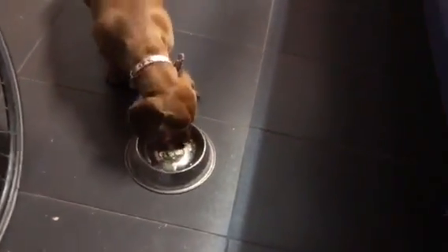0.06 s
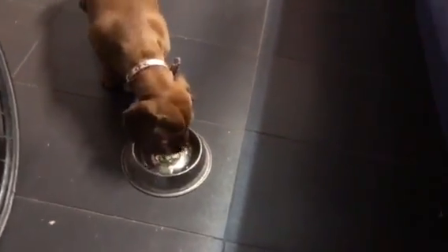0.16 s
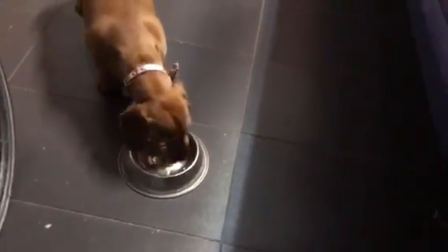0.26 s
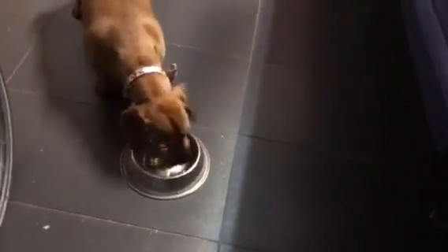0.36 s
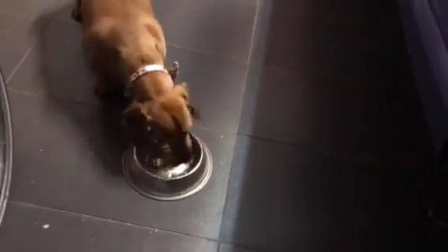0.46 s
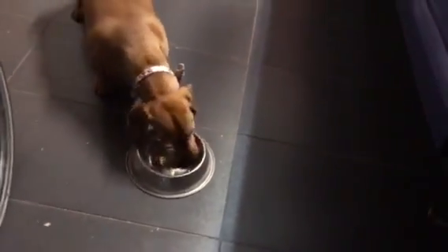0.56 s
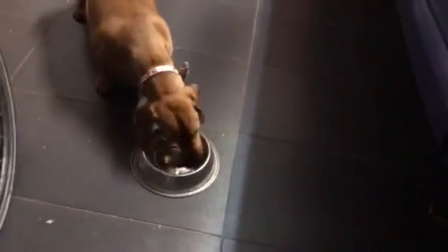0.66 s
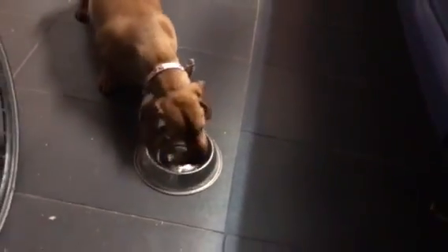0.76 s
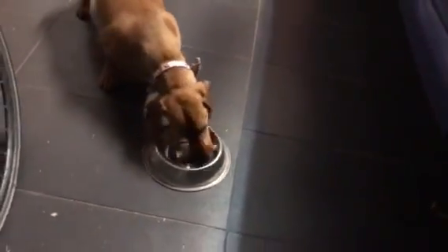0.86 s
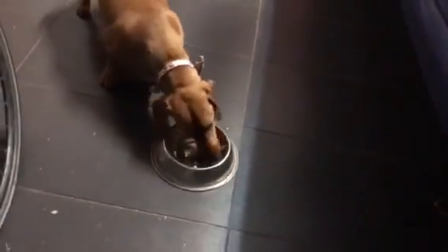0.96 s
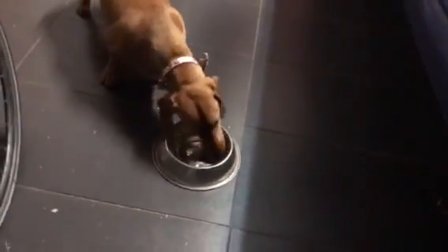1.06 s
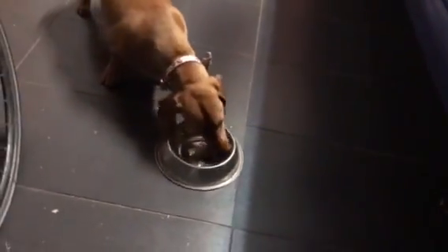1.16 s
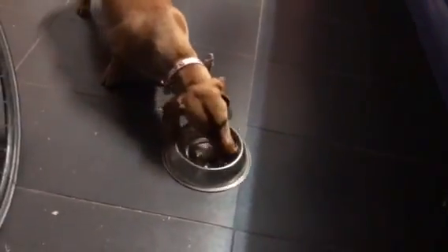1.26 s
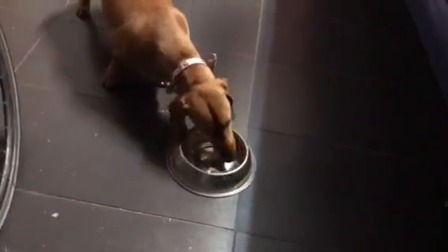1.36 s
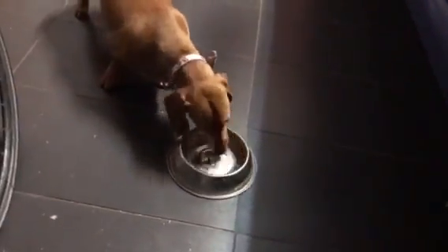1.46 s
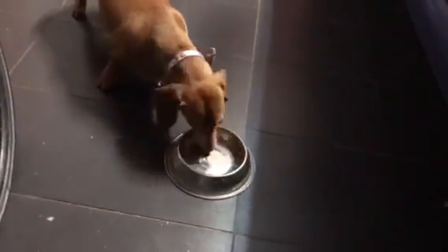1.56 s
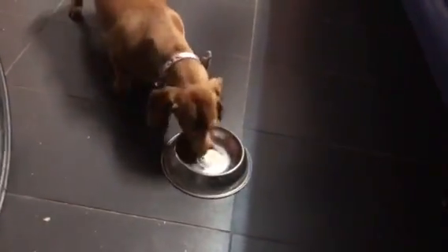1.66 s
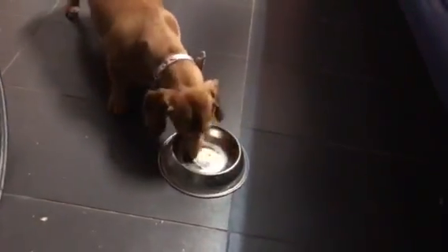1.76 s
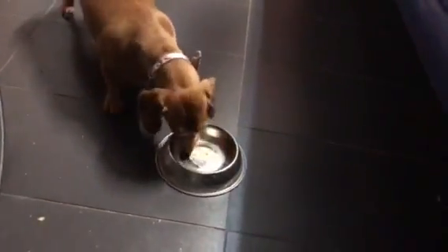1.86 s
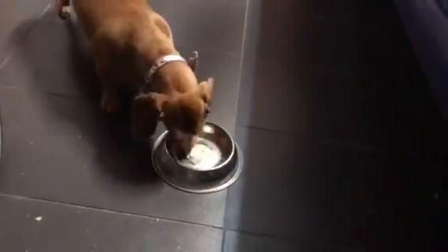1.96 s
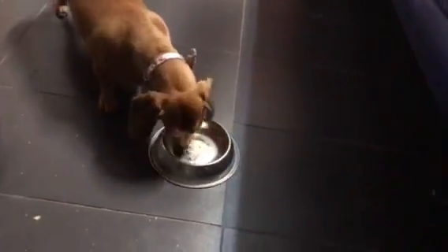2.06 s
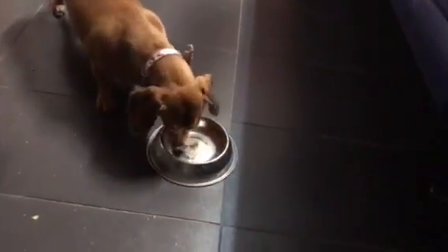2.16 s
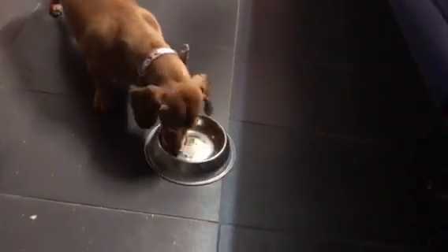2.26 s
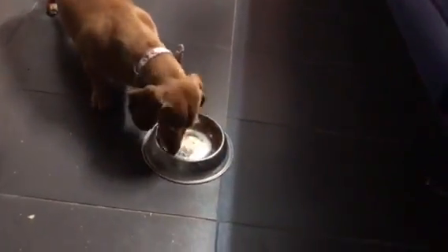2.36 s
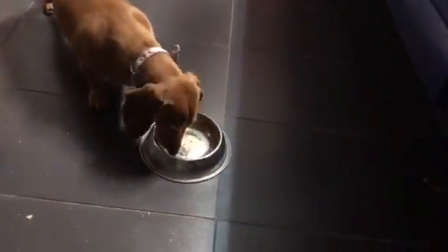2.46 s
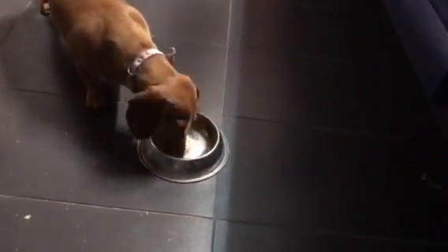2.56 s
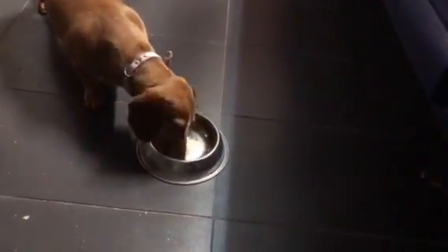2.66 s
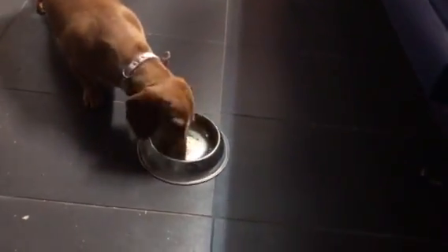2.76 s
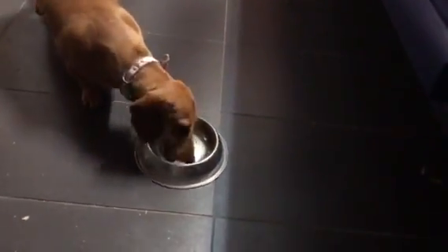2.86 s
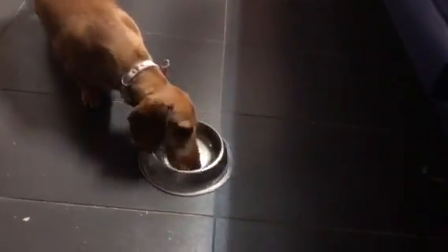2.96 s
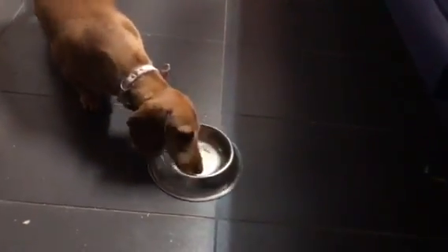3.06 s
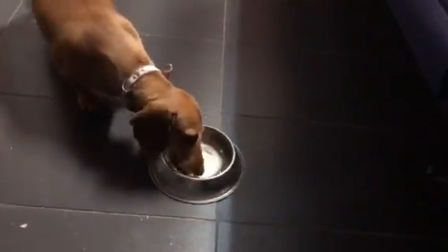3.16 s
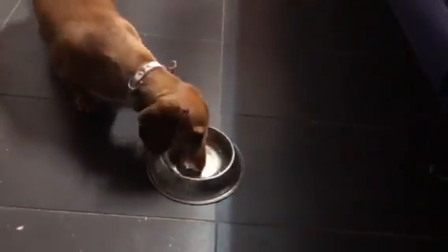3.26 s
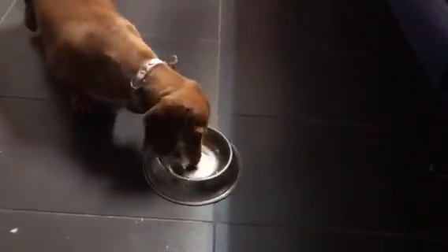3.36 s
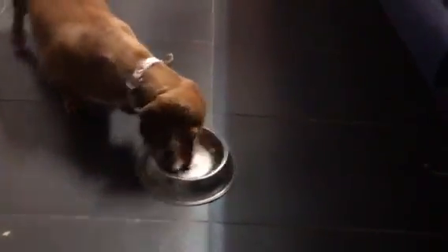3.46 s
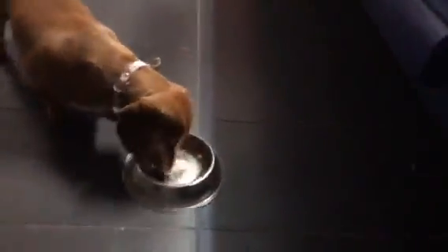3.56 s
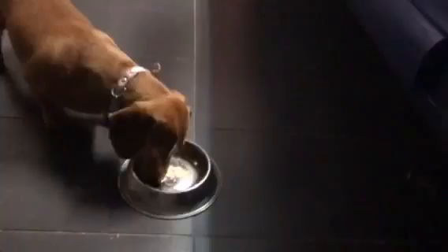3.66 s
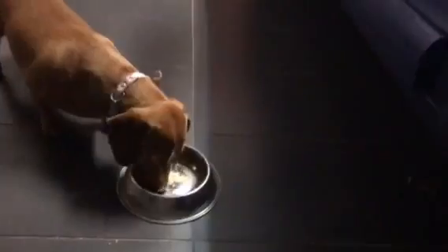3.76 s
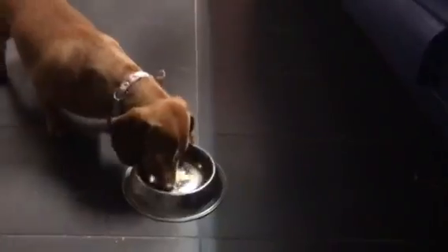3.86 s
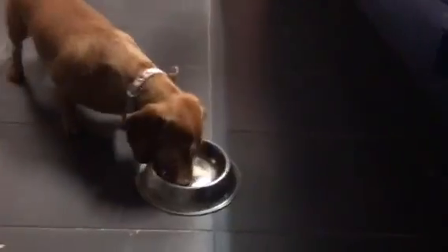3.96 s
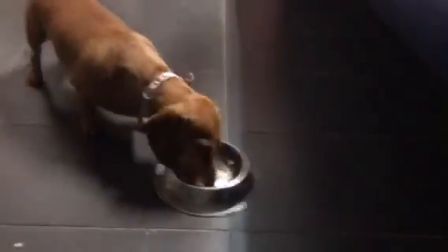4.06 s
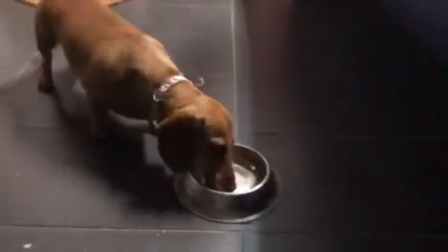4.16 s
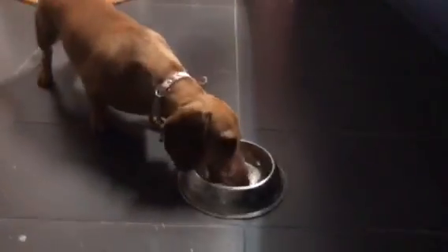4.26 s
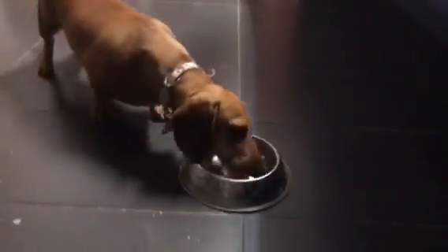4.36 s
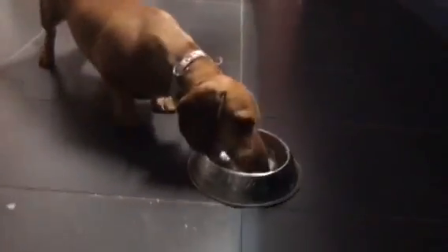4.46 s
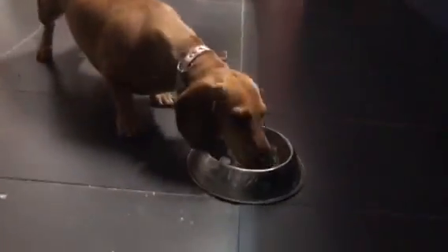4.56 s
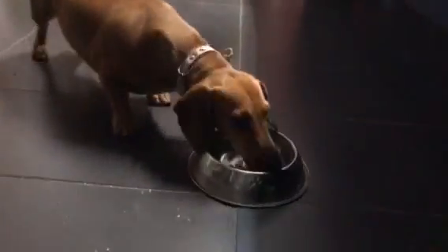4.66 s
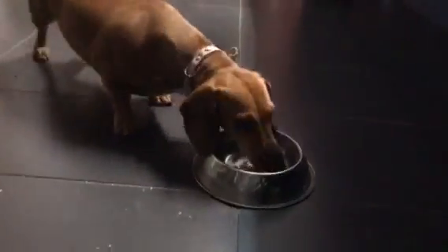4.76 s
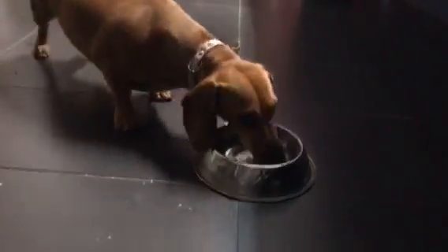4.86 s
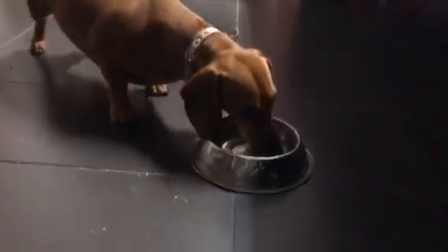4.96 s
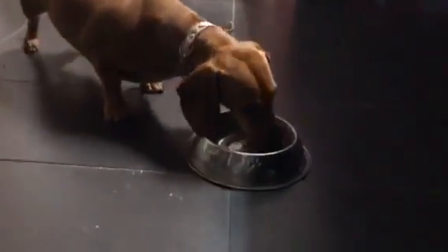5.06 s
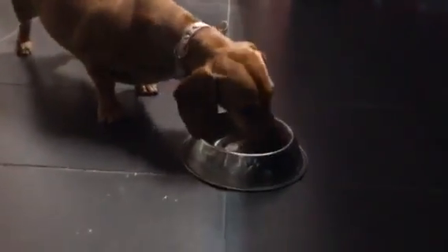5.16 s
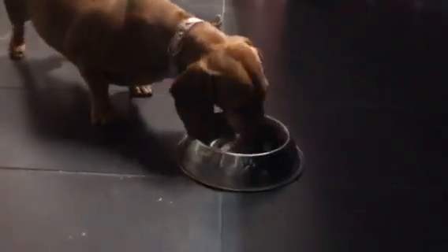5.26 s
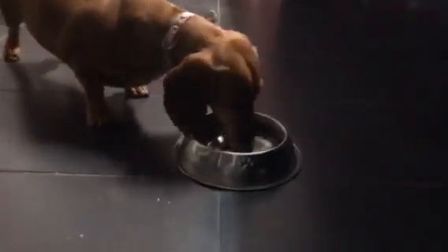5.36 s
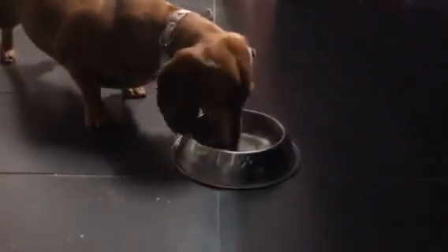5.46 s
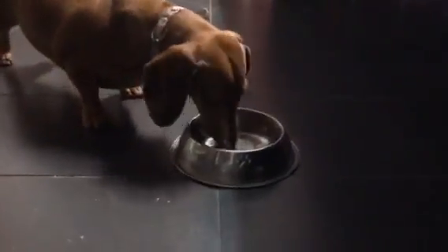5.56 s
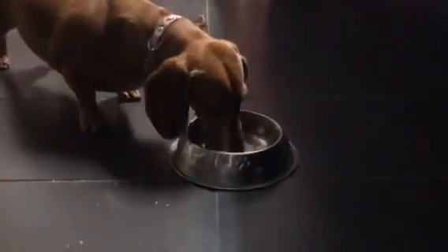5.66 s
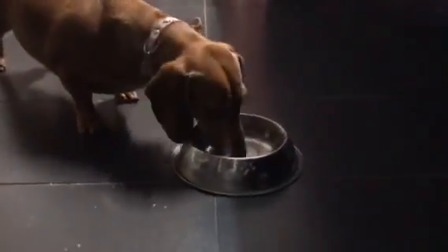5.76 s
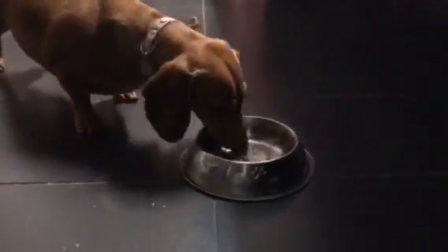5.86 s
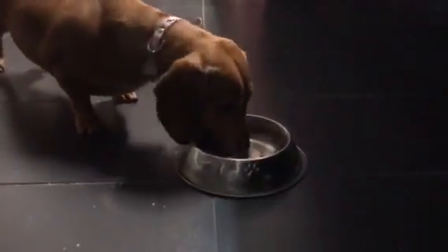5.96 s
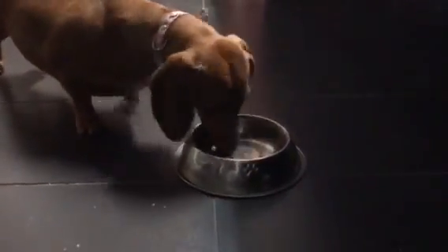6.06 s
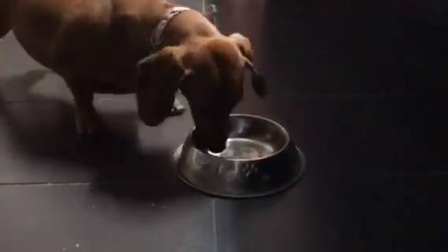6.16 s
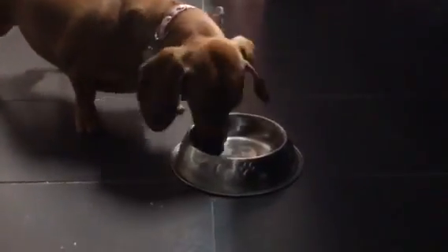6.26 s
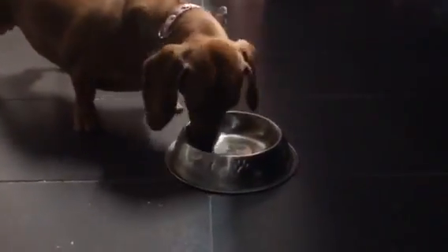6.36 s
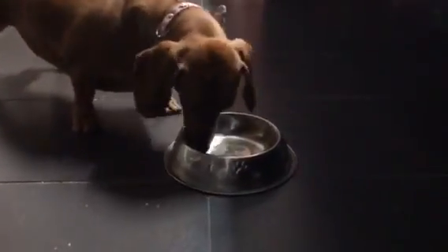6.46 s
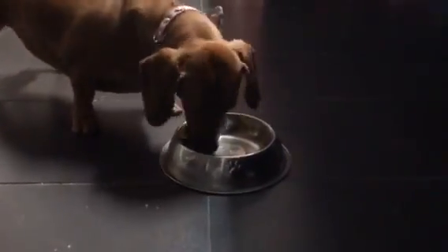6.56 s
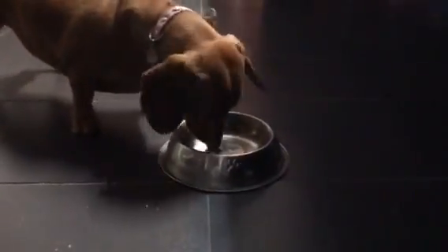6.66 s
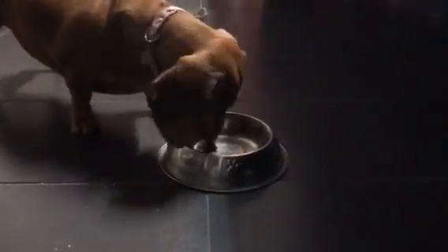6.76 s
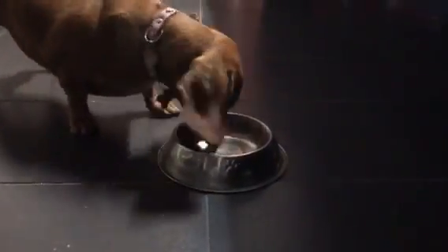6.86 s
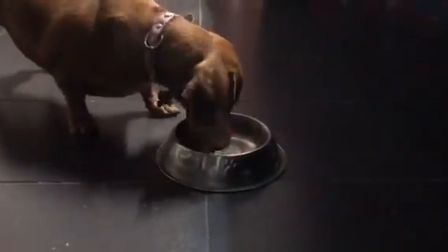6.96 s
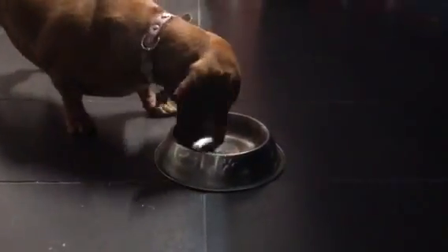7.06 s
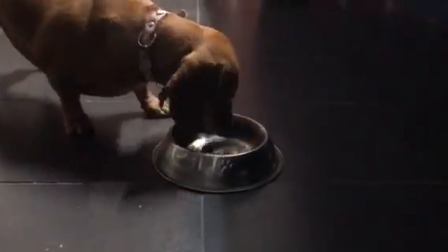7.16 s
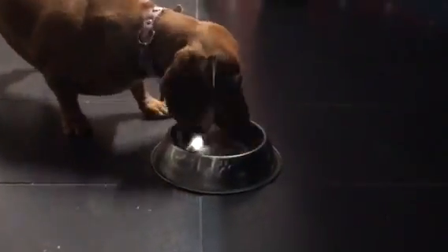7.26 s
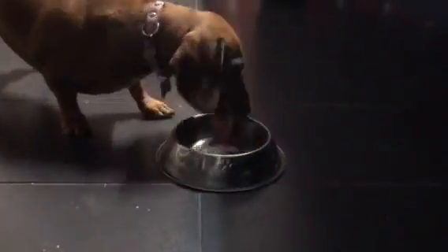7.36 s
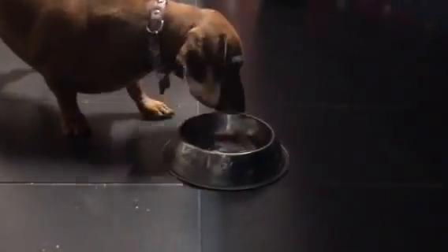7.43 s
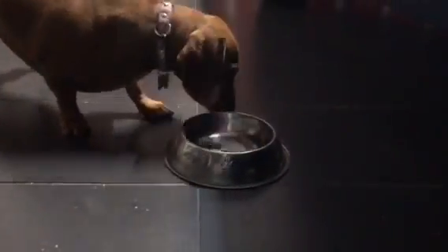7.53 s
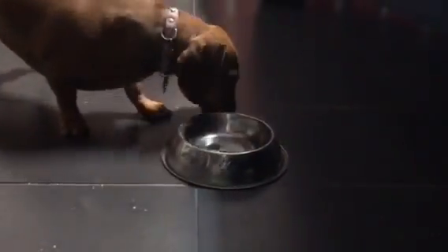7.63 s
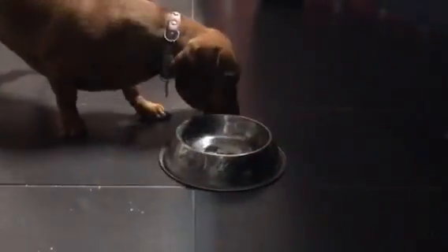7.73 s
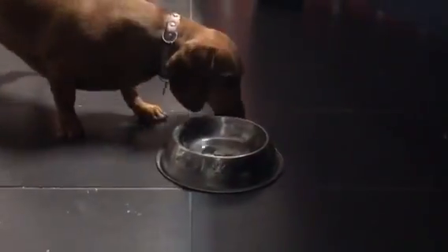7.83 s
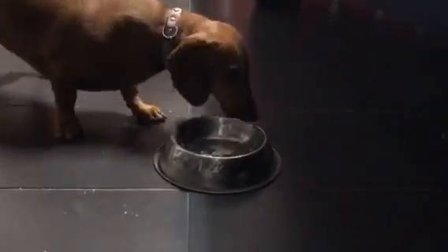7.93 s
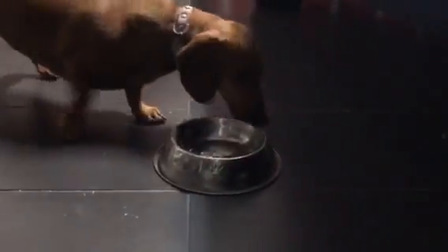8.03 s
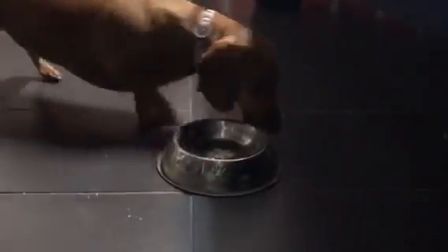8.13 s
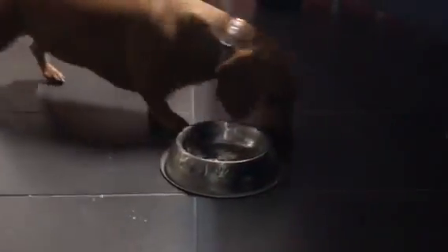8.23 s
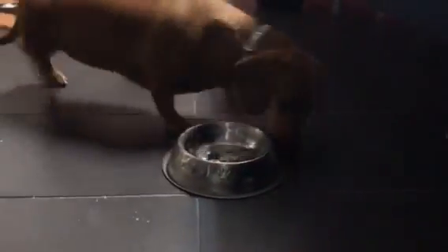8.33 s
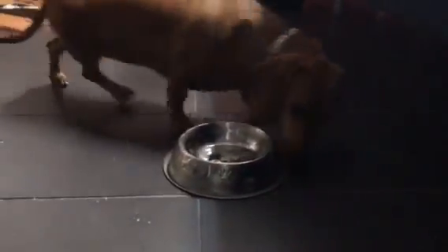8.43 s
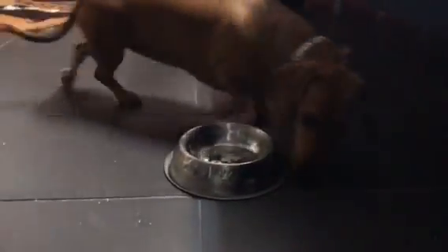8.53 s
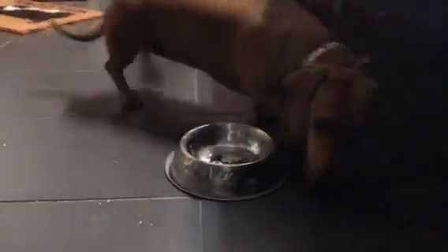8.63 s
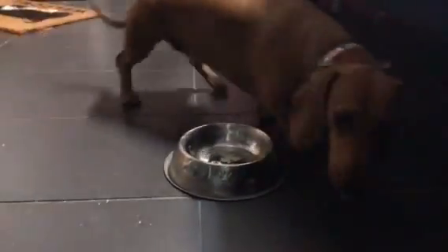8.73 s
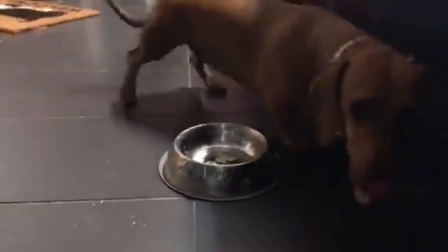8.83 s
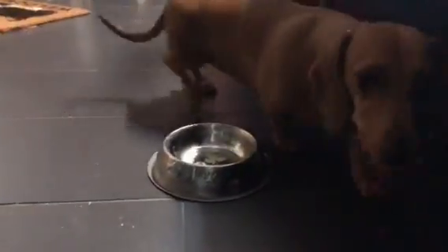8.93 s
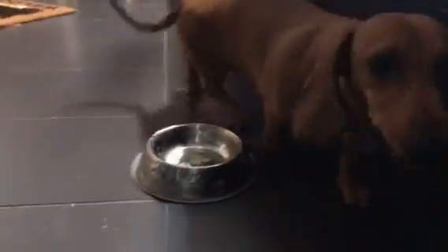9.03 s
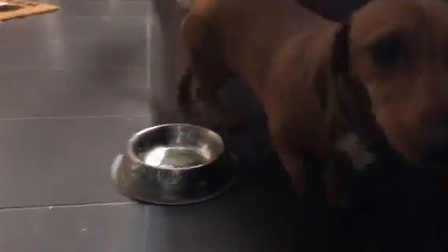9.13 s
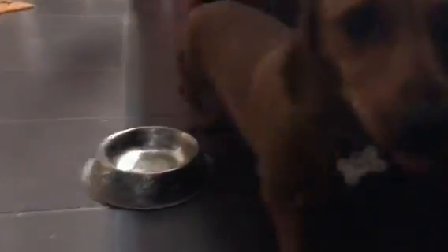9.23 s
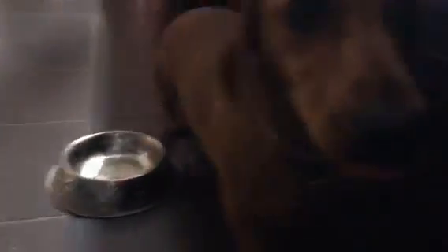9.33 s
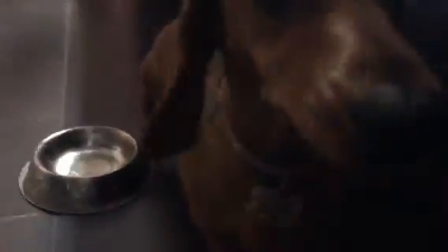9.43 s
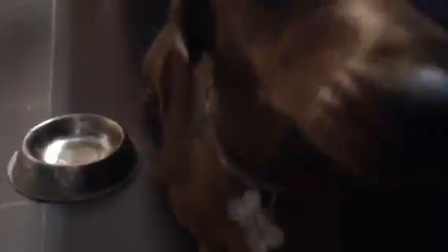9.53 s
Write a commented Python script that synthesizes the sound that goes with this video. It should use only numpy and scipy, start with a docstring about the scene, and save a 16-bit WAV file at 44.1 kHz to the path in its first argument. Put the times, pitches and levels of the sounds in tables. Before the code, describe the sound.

A dog licks a steel bowl that scrapes and rings on tiles in irregular bursts, then walks off with clicking claws.

```python
"""A small dog licks out a steel bowl in a tiled room; an appliance hums throughout.
For 8 s, pushes of the tongue drag the rim over the tiles: it judders, rings the bowl and slips free
with bright spits. Knocks, wet ticks and sniffs fall among the pushes.
After a last faint scrape at 8.4 s the dog walks off, claws clicking, pads brushing the tiles."""
import sys
import numpy as np
from scipy import signal
from scipy.fft import rfft, irfft, next_fast_len
from scipy.io import wavfile

SR = 44100
rng = np.random.default_rng(int(sys.argv[2]) if len(sys.argv) > 2 else 0)


def unload_audio(sound):
    """Save the sound as a 16-bit wav file, at the path given as the first command line argument."""
    columns = np.transpose(np.atleast_2d(sound))
    # keep every value between -1 and 1, then stretch to whole-number steps
    steps = np.round(np.clip(columns, -1, 1) * 32767)
    wavfile.write(sys.argv[1], SR, steps.astype(np.int16))


N = 422919

# room tone spectrum: (frequency [Hz], relative density [dB])
AIR_SPECTRUM = [(53, -11), (90, 3), (184, 2), (488, -5.5), (896, -5.5), (2830, -12), (4750, -13),
                (8910, -20), (15000, -23), (16000, -22)]
# motor drone bands: (centre [Hz], width [Hz], level before swell [dB])
DRONE_BANDS = [(61, 9.1, -62), (136.5, 9.3, -71), (2400, 28, -79.5), (2400, 8.7, -90)]
# drone grows as the microphone sinks: (time [s], gain [dB])
DRONE_SWELL = [(0, -6), (2, -3), (4, -4), (6, 4), (7.3, 4), (8.3, 0.5), (9.59, 5)]
# sniffs, brushing pads: (time [s], nominal length [s], level [dB], centre [Hz], body re hiss [dB])
PUFFS = [(3.394, 0.18, -62.5, 5000, 3), (3.70, 0.073, -61, 4470, 1), (3.772, 0.27, -49.5, 5560, -29),
         (4.967, .05, -61, 4000, -8), (7.249, 0.45, -63, 5060, 6), (8.097, 0.16, -61.5, 4500, 5),
         (8.24, 0.032, -66, 3960, -1), (8.35, .04, -60, 9000, -16), (8.397, 0.036, -61.5, 11000, -10),
         (8.454, 0.07, -66.5, 5000, -1), (8.523, 0.15, -74, 6040, 5), (8.66, 0.09, -73.5, 5000, 9),
         (8.845, 0.17, -55, 4500, -3), (9.028, 0.03, -54.5, 4960, -12), (9.07, 0.061, -63.5, 11000, -10),
         (9.169, 0.03, -67, 6000, -3), (9.323, .05, -100.5, 5000, -19), (9.429, 0.1, -59, 8000, -1)]
# claws, wet tongue ticks: (time [s], relative peak [dB], centre [Hz], body gain [dB])
TICKS = [(0.1344, -46, 2790, 7), (0.1695, -35, 2790, -12), (2.4193, -39, 9750, -2),
         (3.7713, -33.5, 4840, -25), (4.986, -39, 5060, 5), (5.5734, -44, 2530, 15),
         (5.6465, -37, 11800, -22), (5.7234, -54.5, 2610, 11.5), (5.7747, -37, 6240, -20),
         (6.263, -32, 6400, -16), (6.578, -39.5, 7050, -7), (6.977, -30.5, 6100, -26),
         (7.005, -38, 10100, -14), (8.097, -40, 6500, -15), (8.459, -41.5, 3250, -18),
         (8.567, -51.5, 2780, 7), (8.628, -40, 6790, -12), (8.6392, -25, 5600, -30),
         (8.6499, -29, 4270, -10), (9.0259, -30.5, 3370, -29), (9.0838, -50, 3320, -18),
         (9.1553, -31, 7900, -43), (9.1603, -37, 8560, -23), (9.2705, -31, 12100, -38),
         (9.3194, -21.5, 4750, -48), (9.3915, -32.5, 6050, -23), (9.4223, -41, 5150, -5),
         (9.4357, -34, 8290, -22), (9.4555, -34, 6290, -10), (9.4653, -27.5, 7100, -30),
         (9.483, -38, 3030, 3.5)]
# bowl knocks, tongue pops: (time [s], peak [dB], centre [Hz], decay [cycles], wall clank gain [dB])
KNOCKS = [(0.385, -32.5, 789, 3.5, 12), (0.762, -30, 290, 6.5, -3), (1.285, -31, 880, 4.0, 1),
          (1.387, -18.5, 930, 4.8, 8), (1.823, -39, 1190, 4.0, -10), (2.036, -40, 996, 4.0, -11),
          (2.547, -49, 150, 3.6, -7), (3.397, -40.5, 410, 6, -8), (3.674, -46.5, 899, 5.4, -15),
          (3.812, -40.5, 317, 4.4, 7), (3.952, -40, 331, 5.2, -9), (4.161, -30, 1080, 4.7, -11),
          (4.425, -28, 576, 4.7, 12), (5.201, -38.5, 710, 4.0, -11), (5.573, -30.5, 400, 5.9, -15),
          (7.774, -39.5, 507, 5.7, -2)]
# rim slipping free: (time [s], relative peak [dB])
SLIPS = [(0.3896, -21), (0.7628, -20), (1.3215, -23), (1.8423, -31), (2.0254, -33), (2.1222, -20),
         (2.9892, -20), (3.0536, -22), (3.1319, -18), (4.177, -21), (4.4225, -19.5), (4.5616, -20),
         (5.6462, -48), (5.7744, -44.5), (5.8417, -26.5), (6.2623, -47), (6.3611, -35), (6.9762, -47),
         (7.4127, -24), (7.4995, -17)]
# bowl modes: (frequency [Hz])
MODE_HZ = [376, 451, 538, 610, 708, 903, 1040, 1120, 1177, 1323, 1604, 1750, 1912, 2035, 2064, 2190, 2530,
           2794, 3393, 3863, 4130, 4352, 4527, 4984, 5390, 5785, 6100, 6310, 6660, 8060]
# same modes: (pressed width [Hz], gain [dB], free T60 [s])
MODE_RESPONSE = [(33.6, -4, 0.17), (30, -10.5, .4), (25, -12, 0.23), (25.2, -9.5, 0.3), (32.4, -9, 0.47),
                 (20.4, -2.5, 0.22), (22, -12.5, .4), (34, -11, 0.36), (19.8, 0, 0.6), (8.5, -12, 0.57),
                 (32.4, -6.5, 0.47), (43.2, -4, 0.55), (14, -4.5, 0.92), (15, -8.5, 0.98), (20, -5, 0.62),
                 (39, -20, .4), (35, -18.5, 0.2), (33.8, -6, 0.49), (25, -7, 0.29), (20, -13, 1),
                 (11, -17.5, 0.94), (14, -15, 1), (12, -16, 0.51), (17, -19.5, 1), (16, -19, 0.76),
                 (45, -14.5, .5), (19, -17, 0.54), (8.5, -16, .5), (22, -17.5, 0.36), (11, -20.5, .4)]
# where the tongue presses selects the low modes: (time [s], favoured pitch [Hz], floor boom gain [dB])
TONGUE_PRESS = [(0.0, 636, 5), (0.58, 845, 3.5), (0.71, 590, 4.5), (0.93, 800, 5), (1.29, 660, 1),
                (1.8, 972, 6.5), (2.18, 626, 4), (2.47, 813, -4), (3.25, 910, 1), (3.5, 454, 4),
                (3.63, 671, 0), (3.92, 492, 11), (4.08, 803, 9), (4.28, 940, -5.5), (4.61, 556, 3),
                (4.81, 653, 7), (5.06, 454, -2), (5.15, 834, -10), (5.3, 910, -4), (5.55, 542, 11),
                (5.7, 998, -1), (6.15, 902, 0), (6.37, 604, 0), (6.64, 850, 2.5), (6.86, 830, -5),
                (7.24, 479, 0), (7.57, 454, -1), (8.0, 720, 2)]
# rim-on-tile rumble spectrum: (frequency [Hz], relative density [dB])
RUMBLE_SPECTRUM = [(120, -57), (250, -14), (400, -19.5), (1000, -11), (1900, -18.5), (2500, -21.5),
                   (4500, -42), (7000, -37), (9000, -36)]
# tile thrum under the bowl: (frequency [Hz], relative density [dB])
BOOM_SPECTRUM = [(60, -45), (130, -1), (220, -1.5), (400, 0), (1000, -36)]
# grit spectrum: (frequency [Hz], relative density [dB])
GRIT_SPECTRUM = [(5000, -23), (7400, -10), (8500, -1.5), (11500, -0.5), (14000, -2.5), (16000, 0.5)]
# bowl dragged over tile, in segments: (time [s], push level [dB], wall gain [dB], grit gain [dB])
DRAG_SEGMENTS = [
    [(0.0, -59.5, 1, -13), (0.062, -70, -27, -16), (0.088, -70, -1, 8), (0.138, -46.5, -6.5, -10),
     (0.266, -70, -7, -18), (0.28, -78, 1, -1), (0.346, -41.5, -16, -13), (0.382, -40, -8, 0.5),
     (0.512, -33.5, -10.5, -13), (0.6, -51, -9, -13), (0.784, -35.5, -11.5, -5), (0.864, -53.5, -4.5, -2),
     (0.992, -24, -10.5, -6), (1.096, -42, -8.5, -10.5), (1.216, -57.5, -5.5, -7), (1.288, -36.5, -18, -7),
     (1.332, -28, -3.5, -3.5), (1.376, -38.5, -12, -3), (1.402, -25.5, -2, -7), (1.484, -40.5, -7, -1.5),
     (1.6, -55, 4, -10)],
    [(1.6, -55.5, 5, -16), (1.644, -59, -3, -8), (1.662, -41, -17, -8), (1.708, -40, -10, 2),
     (1.786, -58.5, -2, -10), (1.822, -40.5, -19, -9), (2.01, -74.5, 3, -6), (2.04, -35.5, -11.5, -8.5),
     (2.12, -33, -9.5, -2.5), (2.216, -55.5, 0.5, -5), (2.396, -63, -5, -8), (2.44, -46.5, -11, -4),
     (2.536, -85, 15, -4), (2.55, -72, -20, -18)],
    [(2.55, -79, -16, -21), (2.58, -74, -8, -7), (2.666, -42.5, -12, -1), (2.804, -37, -7, -2.5),
     (2.886, -55.5, -4, -12), (2.924, -33, -18, -9), (2.986, -28, -8.5, -6), (3.054, -28, -7.5, -5),
     (3.094, -23, -20.5, -9), (3.128, -36.5, -2.5, 3.5), (3.166, -32.5, -5, 0.5), (3.232, -48.5, -1.5, 0),
     (3.386, -56, -5, -13), (3.4, -51, -24, -22), (3.442, -62, 2, -1), (3.662, -70.5, -11, -6),
     (3.676, -56, -24, -26), (3.706, -70, 12, 3), (3.836, -53.5, -7, -16), (3.974, -61, -23, -19),
     (4.1, -66, 0, -6)],
    [(4.1, -75, 7, 4), (4.128, -72, -8, -21), (4.184, -32, -9, 3), (4.242, -30.5, -1.5, -1),
     (4.394, -50.5, -8, -6.5), (4.448, -28.5, -9, -7), (4.6, -36, 1.5, -3.5), (4.638, -46.5, 6, -4),
     (4.646, -30.5, -6, -15), (4.682, -37, 1.5, 2), (4.806, -34, -7.5, -15), (4.898, -41, -6, -14),
     (4.904, -37, -10, -26), (4.958, -54, -3, -14), (5.15, -71, 1, -11)],
    [(5.15, -77, -9, -4), (5.232, -40.5, -10, -5), (5.384, -68.5, -10, -25), (5.448, -58, -11, 2),
     (5.484, -69, -10, -6), (5.572, -49.5, -8, -2), (5.63, -60, -9, -28), (5.642, -61.5, -8, -12),
     (5.744, -73, -27, -24), (5.78, -105, 19, 21), (5.8, -78, -11, -1)],
    [(5.8, -62, -11, -2), (5.818, -39, -14, -17), (5.844, -27, -10, -6.5), (5.936, -27.5, -4.5, -4),
     (5.95, -27.5, -20, -10.5), (6.004, -31.5, -10, -5.5), (6.084, -32, -12, -15), (6.256, -56.5, -10, -21),
     (6.262, -59, -1, -13), (6.326, -61, -9, -26), (6.368, -34, -16, -8), (6.448, -32.5, -11, -13.5),
     (6.562, -58, -5.5, -22), (6.618, -31, -19, -10), (6.696, -31, -8.5, -8.5), (6.9, -70, -11, -24)],
    [(6.9, -57.5, -3.5, -26), (6.97, -75, -18, -20), (6.972, -73, 3, -22), (7.012, -45.5, 3, 6.5),
     (7.122, -53.5, -10, -13), (7.168, -44, -18, -7), (7.224, -65, -7, -19), (7.376, -51, -7, -3),
     (7.414, -35.5, -11.5, 3), (7.438, -23.5, -7, -2.5), (7.476, -32, -11, -4.5), (7.512, -22.5, -15, -6),
     (7.57, -25, -6.5, -6.5), (7.656, -48, -1, -8), (7.846, -54.5, -8.5, -7), (8.0, -75, -18, -14)],
    [(8.385, -78, 9, 8), (8.397, -58, -20, -16), (8.411, -51.5, -7, -16), (8.479, -75, -6, 4),
     (8.5, -87, 1, -6)],
]

HUM_HZ, HUM_DB, AIR_DB = 48.4, -58.5, -66
ROOM_BASS_T60_S, ROOM_HALF_T60_HZ, ROOM_GAIN_DB = 0.23, 18000, -24.5
WALL_MODES_FROM_HZ = 2400  # side wall, out of the tongue's reach
FREE_RING_GAIN_DB, SLIP_DECAY_S = -13.5, 0.021


def amp(db):
    """dB to gain."""
    return 10 ** (np.asarray(db) / 20)


def unit_rms(x):
    """Scale to rms 1."""
    return x / np.sqrt(np.mean(x ** 2) + 1e-20)


def curves(segments):
    """Join timed segments; interpolate each column per sample."""
    times_s, *columns = np.concatenate(segments).T
    return [np.interp(np.arange(N) / SR, times_s, column) for column in columns]


def drift(rate_hz):
    """Slow random wander, rms 1."""
    hop, warmup = 40, 2000
    r = np.exp(-2 * np.pi * rate_hz * hop / SR)
    slow = signal.lfilter([1], [1, -2 * r, r * r], rng.standard_normal(N // hop + warmup + 2))[warmup:]
    return np.interp(np.arange(N) / hop, np.arange(len(slow)), unit_rms(slow))


def resonate(x, hz, width_hz):
    """Two-pole resonator, peak gain 1."""
    r = np.exp(-np.pi * width_hz / SR)
    feedback = [1, -2 * r * np.cos(2 * np.pi * hz / SR), r * r]
    return signal.lfilter(np.array([1, 0, -1]) * (1 - r * r) / 2, feedback, x + 1e-18)


def colour(x, spectrum):
    """Filter by a spectrum table; rms 1."""
    size, points = next_fast_len(N), np.array(spectrum)
    hz = np.maximum(np.fft.rfftfreq(size, 1 / SR), 1)
    gain_db = np.interp(np.log(hz), np.log(points[:, 0]), points[:, 1])
    return unit_rms(irfft(rfft(x, size) * amp(gain_db), size)[:N])


def grains(per_s, spread_db):
    """Random clicks of uneven size and sign; rms 1."""
    sizes = amp(spread_db * np.minimum(rng.exponential(1, N), 4)) * rng.choice([-1, 1], N)
    return unit_rms(sizes * (rng.random(N) < per_s / SR))


def burst(peak_db, hz, decay_cycles):
    """A snap, then a short noisy ring."""
    t = np.arange(1500) / SR
    drive = rng.standard_normal(len(t)) * np.exp(-t * hz / decay_cycles)
    drive[0] = np.sqrt(SR / hz)
    wave = resonate(drive, hz, hz / 2.5)
    return amp(peak_db) * wave / np.abs(wave).max()


def add(out, time_s, wave):
    """Mix wave into out."""
    start = round(time_s * SR)
    out[start:start + len(wave)] += wave[:N - start]


def appliance_hum():
    """Wavering motor tone and narrow drones over room tone."""
    tone_peak = np.sqrt(2) * amp(HUM_DB + 1.8 * drift(2.0))
    tone_hz = HUM_HZ + 1.2 * drift(2.5)
    motor = tone_peak * np.sin(2 * np.pi * np.cumsum(tone_hz) / SR)
    swell_db, = curves([DRONE_SWELL])
    for hz, width_hz, level_db in DRONE_BANDS:
        band = resonate(rng.standard_normal(N), hz, width_hz)
        motor += amp(level_db + swell_db) * unit_rms(resonate(band, hz, 2 * width_hz))
    return motor + amp(AIR_DB + drift(9.0)) * colour(rng.standard_normal(N), AIR_SPECTRUM)


def room_reverb(x):
    """Ten feedback delays; the walls damp treble faster."""
    size = next_fast_len(N + SR)
    hz = np.fft.rfftfreq(size, 1 / SR)
    t60_s = ROOM_BASS_T60_S / (1 + hz / ROOM_HALF_T60_HZ)
    lags_s = np.geomspace(0.009, 0.037, num=10)
    loops = (amp(-60 * lag_s / t60_s) * np.exp(-2j * np.pi * hz * lag_s) for lag_s in lags_s)
    response = sum((-1) ** k * loop / (1 - loop) for k, loop in enumerate(loops))
    return irfft(rfft(x, size) * response, size)[:N]


def sniffs_and_pads():
    """Air through the nose, pads brushing tile: hiss over a lower body, quick start, soft end."""
    out = np.zeros(N)
    for time_s, length_s, level_db, hz, body_db in PUFFS:
        progress = np.arange(round(2.1 * length_s * SR)) / (length_s * SR)
        envelope = np.minimum(progress / 0.057, 1) / (1 + (progress / 0.77) ** 6)
        hiss, body = rng.standard_normal((2, len(progress)))
        puff = unit_rms(resonate(hiss, hz, 0.71 * hz))
        puff += amp(body_db) * unit_rms(resonate(body, hz=930, width_hz=2700))
        add(out, time_s, amp(level_db) * envelope * puff)
    return out * amp(0.87 * drift(30.0))


def claw_and_tongue_ticks():
    """Thin bright cracks with a low body; faint wet and furry ticks at random."""
    cracks, bodies = np.zeros((2, N))
    for time_s, peak_db, hz, body_db in TICKS:
        add(cracks, time_s, burst(peak_db - 2, hz, decay_cycles=12.2))
        add(bodies, time_s, burst(peak_db + body_db, hz=1030, decay_cycles=3.1))
    cracks = signal.sosfilt(signal.butter(3, 2000, "high", fs=SR, output="sos"), cracks)
    faint = resonate(grains(per_s=30, spread_db=4), hz=6900, width_hz=7000)
    return cracks + bodies + amp(-77.5) * unit_rms(faint)


def knocks():
    """Dull thuds on the bowl and tongue pops."""
    out = np.zeros(N)
    for time_s, peak_db, hz, decay_cycles, _ in KNOCKS:
        add(out, time_s, burst(peak_db, hz, decay_cycles))
    return out


def slip_envelope():
    """The rim slips free: sudden start, exponential fall."""
    onsets = np.zeros(N)
    for time_s, peak_db in SLIPS:
        onsets[round(time_s * SR)] = amp(peak_db - 15)
    return signal.lfilter([1], [1, -np.exp(-1 / (SLIP_DECAY_S * SR))], onsets + 1e-18)


def rim_grit():
    """Bright tile grain and the crowded upper modes it excites; rms 1."""
    grit = colour(grains(per_s=3500, spread_db=2.5), GRIT_SPECTRUM)
    upper_hz = np.geomspace(8200, 14000, num=60) * rng.uniform(0.89, 1.005, size=60)
    shimmer = sum(resonate(grit * amp(4 * drift(10.0)), hz, width_hz=40) for hz in upper_hz)
    return unit_rms(grit + amp(1) * shimmer)


def bowl_ring(low_force, wall_force, favoured_hz):
    """Each mode sums a broad pressed and a narrow free ring; the tongue favours one low range."""
    out = np.zeros(N)
    for k, (hz, (pressed_width_hz, gain_db, t60_s)) in enumerate(zip(MODE_HZ, MODE_RESPONSE)):
        if hz < WALL_MODES_FROM_HZ:
            favour_db = 5.7 / (1 + (np.log2(hz / favoured_hz) / 0.42) ** 2)
            drive = low_force * amp(favour_db + 4 * drift(6.46))
        else:
            drive = wall_force * amp(2.5 * drift(3.0))
        drive = drive * amp(gain_db) * (-1) ** k
        free_width_hz = np.log(1000) / np.pi / t60_s
        free_gain = amp(FREE_RING_GAIN_DB) * np.sqrt(pressed_width_hz / free_width_hz)
        out += resonate(drive, hz, pressed_width_hz) + free_gain * resonate(drive, hz, free_width_hz)
    return out


def bowl_drag():
    """The rim stutters over tile: rumble, modes and grit share one judder; knocks ring the wall."""
    push_db, wall_db, grit_db = curves(DRAG_SEGMENTS)
    favoured_hz, boom_db = curves([TONGUE_PRESS])
    judder = amp(push_db + 1.94 * drift(33.4))
    rumble = amp(-7) * judder * colour(grains(per_s=3000, spread_db=1.5), RUMBLE_SPECTRUM)
    boom = amp(boom_db - 17) * judder * colour(grains(per_s=600, spread_db=1), BOOM_SPECTRUM)
    force = amp(15) * judder * grains(per_s=4000, spread_db=2.5)
    blows = np.zeros(N)
    for time_s, peak_db, _, _, clank_db in KNOCKS:
        blows[round(time_s * SR)] = amp(peak_db + clank_db + 30)
    ring = bowl_ring(force, amp(wall_db + 10) * force + blows, favoured_hz)
    grit_envelope = amp(grit_db - 2) * judder + slip_envelope()
    return rumble + boom + ring + grit_envelope * rim_grit()


def scene():
    """Dog and bowl with room reverb, over the hum; two equal channels."""
    near = bowl_drag() + claw_and_tongue_ticks() + knocks() + sniffs_and_pads()
    return np.tile(near + amp(ROOM_GAIN_DB) * room_reverb(near) + appliance_hum(), (2, 1))


def record(dry):
    """Two steep low-passes cut the top treble."""
    pass_hz, stop_hz = 15700, 16800
    trimmed = signal.sosfilt(signal.ellip(10, 0.3, 46, pass_hz, fs=SR, output="sos"), dry)
    return signal.sosfilt(signal.cheby2(16, 40, stop_hz, fs=SR, output="sos"), trimmed)


dry = scene()
out = record(dry)
unload_audio(out)
```